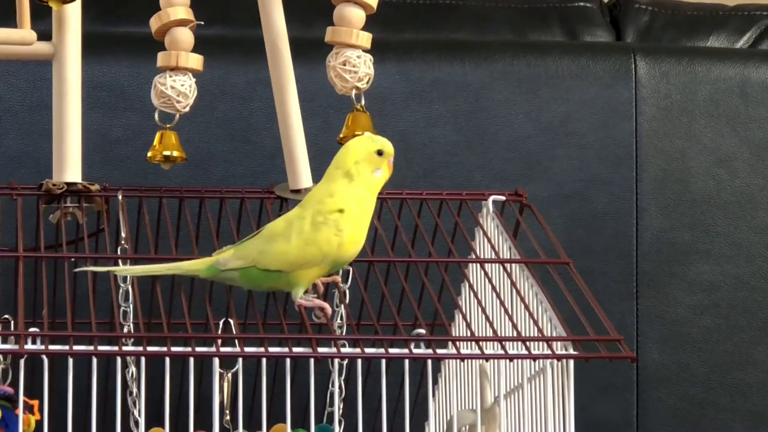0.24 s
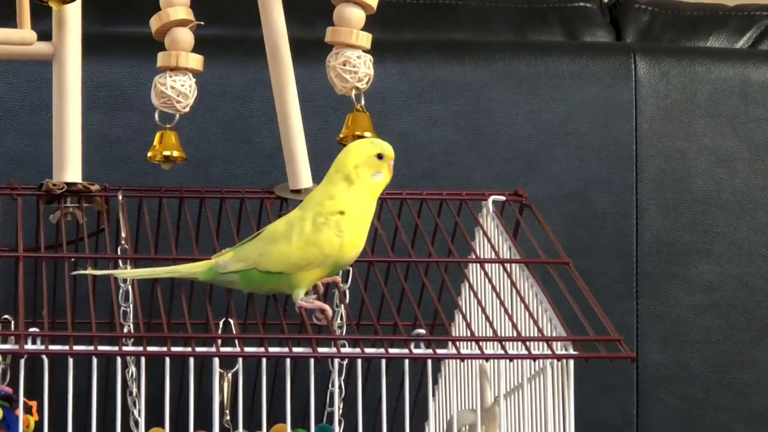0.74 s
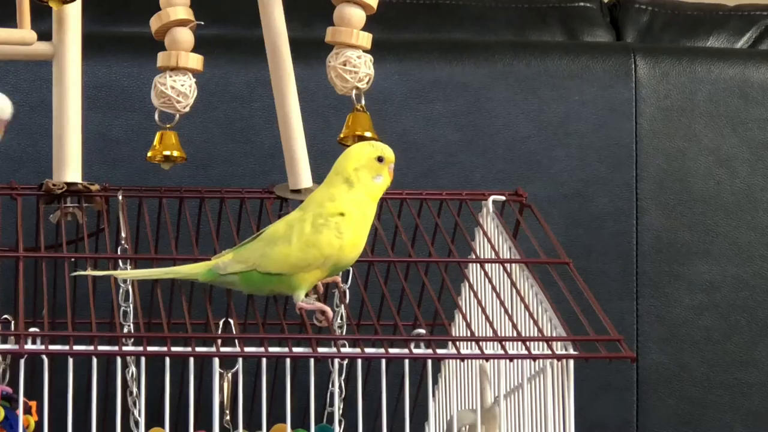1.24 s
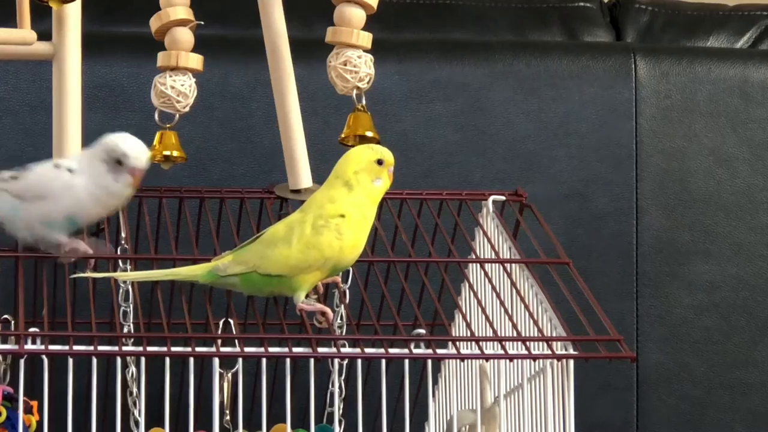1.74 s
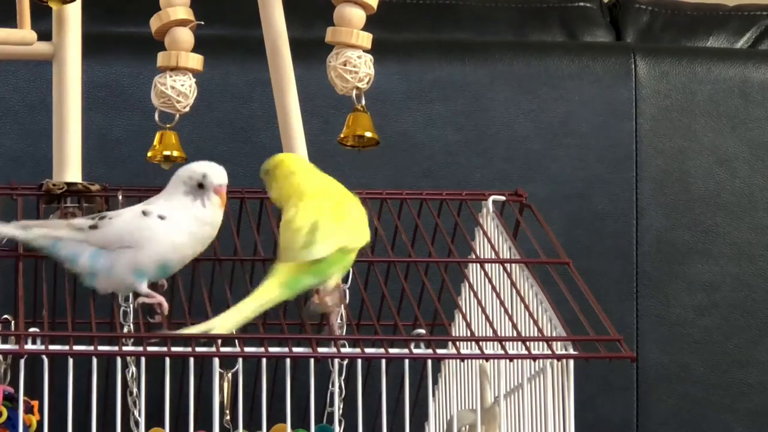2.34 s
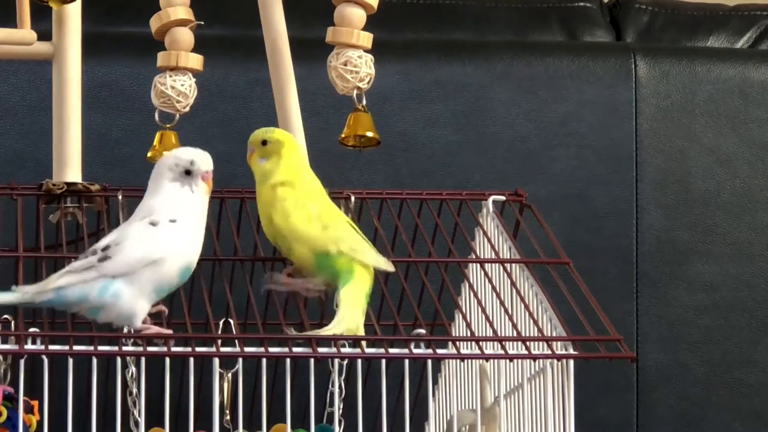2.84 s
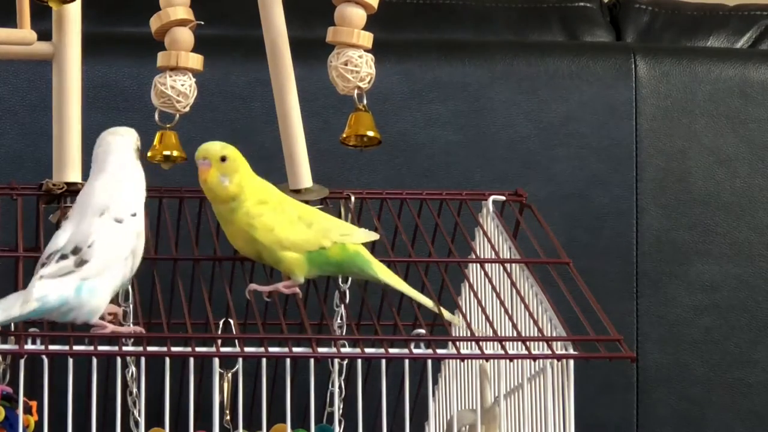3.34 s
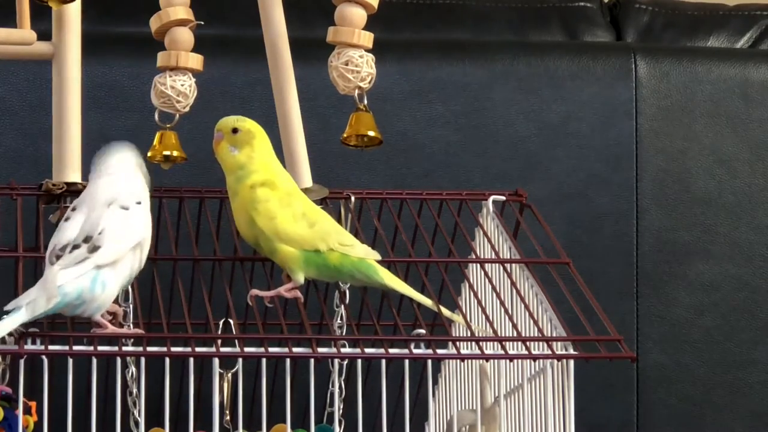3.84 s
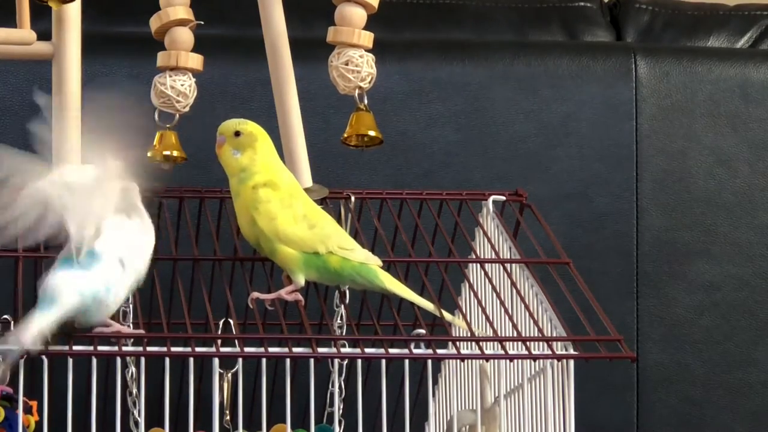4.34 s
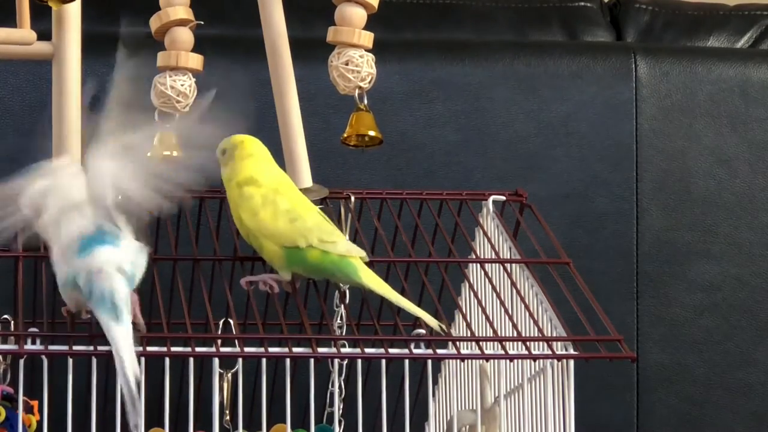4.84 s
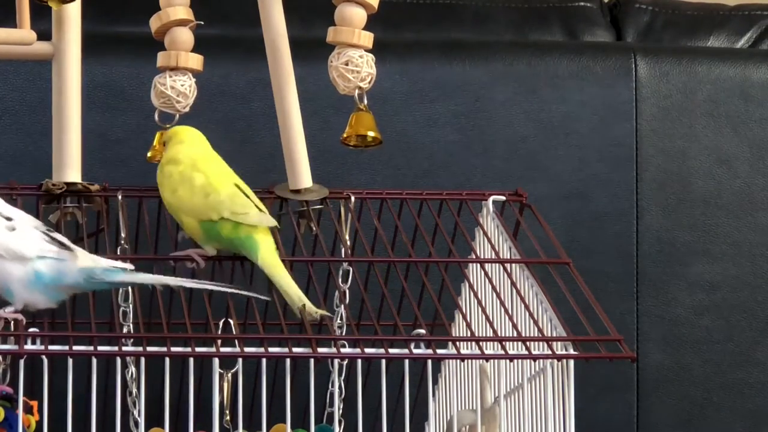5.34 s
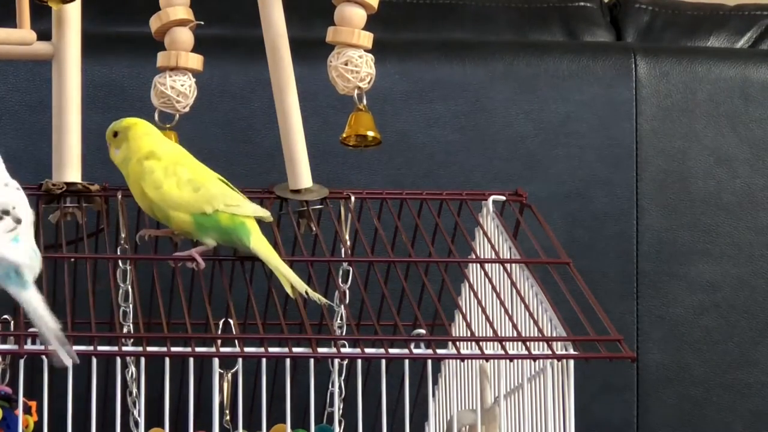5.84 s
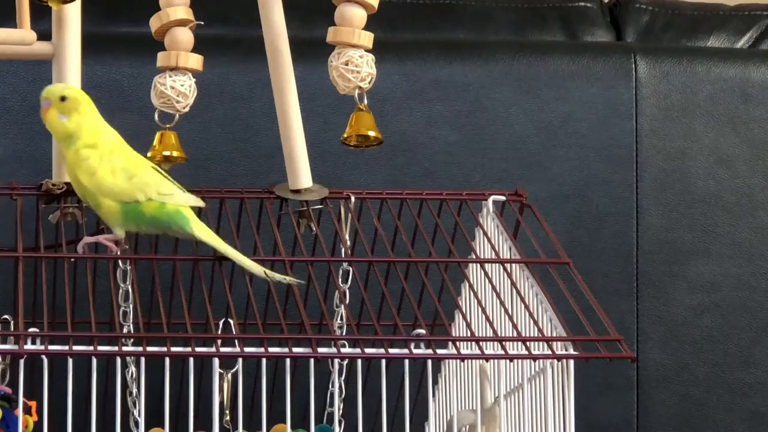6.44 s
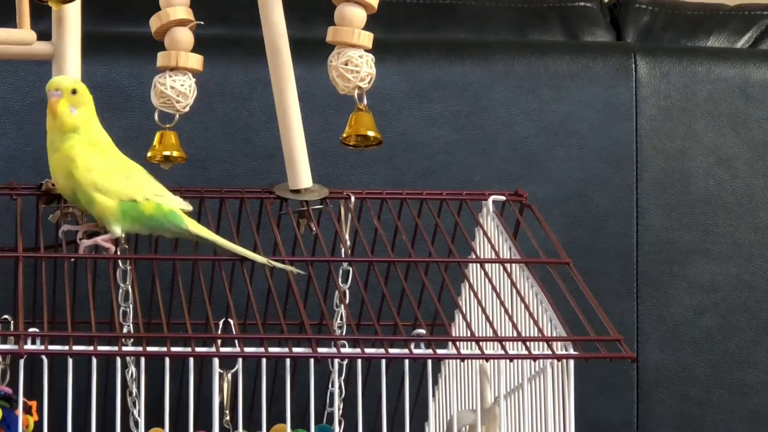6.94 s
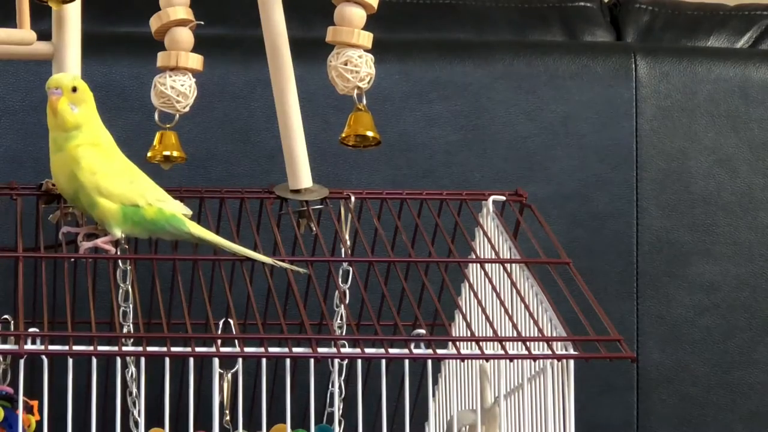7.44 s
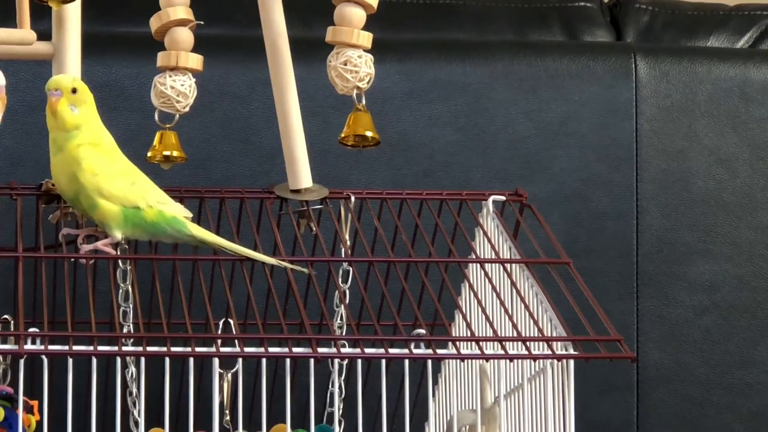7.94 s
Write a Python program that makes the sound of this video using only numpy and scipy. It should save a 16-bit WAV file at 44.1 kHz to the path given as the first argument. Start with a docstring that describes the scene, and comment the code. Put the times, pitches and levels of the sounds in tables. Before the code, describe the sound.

Two budgerigars chatter indoors with quick whistled warbles, peeps, slurs and clucks, a few harsh squawks, and faint claw scrapes on cage wires.

```python
"""Two budgerigars chatter on top of their cage in a small, fairly live room.
A quick whistled warble keeps returning among peeps, slurs and soft muttering; each note is a gliding tone.
Clucks, croaks and squawks are trains of sharp pulses that ring the throat.
Claws scrape the ringing cage wires and wings push soft gusts of air.
The walls draw out the calls and scrapes, over a quiet, steady room noise."""
import sys
import numpy as np
from scipy import signal
from scipy.fft import rfft, irfft
from scipy.io import wavfile
from scipy.ndimage import map_coordinates

SR = 44100
rng = np.random.default_rng(int(sys.argv[2]) if len(sys.argv) > 2 else 0)


def dump(signal):
    """Clip the signal to [-1, 1] and save it as 16-bit WAV at the path in sys.argv[1]."""
    limited = np.clip(np.atleast_2d(signal).T, -1, 1)
    pcm = np.round(limited * 32767).astype(np.int16)
    wavfile.write(sys.argv[1], SR, pcm)


N = 360738
LEAD_IN = SR // 5  # samples in which the room is already sounding
TOP_HZ = 15900  # the recorder keeps what lies below this

# Steady room noise. Each row: frequency in Hz, relative level in dB per Hz.
ROOM_NOISE = [(25, -26), (45, -8.5), (68, 2.5), (130, 4), (200, 1), (300, 2), (600, -3.5), (1200, -6),
              (2400, -18), (4000, -25.5), (7000, -31), (11000, -38.5), (16000, -33)]
ROOM_NOISE_DB = -55
# How long the room rings. Each row: frequency in Hz, time to fade by 60 dB in seconds.
ROOM_FADE_TIMES = [(500, 1), (2000, 0.72), (3200, 0.58), (5000, 0.52), (7000, 0.43), (10000, 0.31),
                   (15000, 0.17)]

# Wing beats. Each row: start in seconds, length in seconds, level in dB.
WING_BEATS = [(4.329, 0.12, -66), (4.807, 0.16, -65.5)]

# Claws on the cage top. Each row: start in seconds, length in seconds,
# level in dB before shorter scrapes are made softer.
CLAW_STEPS = [(0.796, 0.05, -72), (1.738, 0.027, -65.5), (1.906, 0.032, -73), (2.268, 0.22, -67.5),
              (3.192, 0.081, -69), (5.108, 0.044, -61), (5.739, 0.3, -79), (6.213, 0.054, -77.5),
              (6.399, 0.18, -66), (7.549, 0.25, -78)]
# Ringing cage wires. Each row: frequency in Hz, time to fade by 60 dB in seconds, relative level in dB.
CAGE_WIRES = [(4420, 0.37, -7.5), (5660, 0.15, -7.5), (6900, 0.21, 4.5), (8050, 0.11, -1.5),
              (9500, 0.15, -5), (10760, 0.098, -3), (12500, .15, 0), (13500, 0.13, -23), (14100, .12, -13)]

# All levels of pulsed calls and whistles below are in dB before each group is turned down as a whole.
# Upper throat resonances. Each row: multiple of the call's upper resonance, width in Hz, relative level in dB.
UPPER_RESONANCES = [(.78, 1370, -5), (1.002, 1590, 0), (1.48, 2600, -16.5)]
LOWER_WIDTH_HZ = 1500
PUFF_S = .0008  # time from a snap to the peak of its puff of air

# Long squawks that swell to a screech. Each row: start in seconds, length in seconds, first pulses per second,
# last pulses per second, level in dB, swell in dB, upper resonance in Hz, lower resonance in dB, hiss in dB.
LONG_SQUAWKS = [ (3.826, .066, 178, 217, -26, 23, 6230, -4.5, -15.5),
                (4.245, 0.082, 210, 188, -20.5, 25.5, 5770, -10.5, -23.5),
                (4.736, .077, 202, 300, -23, 11.5, 5750, -8.5, -25.5),
                (7.961, 0.074, 170, 182, -21, 12, 6400, -10.5, -22), ]
SQUAWK_LOWER_RATIO = 0.5  # lower resonance as a share of the upper

# Clucks of a few pulses. Each row: start in seconds, length in seconds, level in dB, swell in dB,
# upper resonance in Hz, lower resonance in dB, hiss in dB.
SHORT_CLUCKS = [ (0.357, .012, -36, 36, 4770, 8.5, -50), (.583, 0.0039, -47, 19, 4970, -3, -47),
                (1.154, .008, -41, 2, 4630, -3, -26), (1.187, .015, -38.5, 12, 4500, 0.5, -47),
                (1.275, 0.015, -37.5, 5, 5400, -1, -21.5), (1.991, 0.025, -35, -5, 5430, -9, -16),
                (2.749, 0.041, -38.5, 6, 5530, -4, -19.5), (6.687, 0.026, -37.5, 3.5, 5650, -2, -41),
                (6.706, .01, -28, 7, 6150, -9, -28), (6.716, 0.038, -37.5, -14, 5470, 0.5, -36),
                (6.843, 0.0058, -46, 0.5, 5650, -15, -21), ]
# First and last pulses per second of a cluck.
CLUCK_PULSE_RATES = (150, 120)
CLUCK_LOWER_RATIO = 0.54  # lower resonance as a share of the upper

# Croaks, in which the lower resonance leads. Each row: start in seconds, length in seconds, level in dB,
# lower resonance in Hz, lower resonance in dB.
LOW_CROAKS = [(1.341, 0.024, -43.5, 2020, 10), (2.795, .1, -47, 1570, 15), (5.553, .05, -48, 2330, 26)]
# First and last pulses per second of a croak.
CROAK_PULSE_RATES = (230, 160)
CROAK_SWELL_DB, CROAK_UPPER_HZ, CROAK_HISS_DB = -5, 5470, -20.5

NOTE_RISE_S, NOTE_FALL_S = .0045, .006  # how fast every whistled note starts and stops

# Soft muttering. Each row: start in seconds, length in seconds, level in dB.
MUTTER_STRETCHES = [(0.468, .05, -57), (1.775, .10, -56.5), (2.383, .13, -51.5), (2.912, .15, -55),
                    (5.615, .09, -58), (5.719, .80, -60)]
MUTTER_STEP_S, MUTTER_NOTE_S = .055, 0.029  # spacing and length of its notes
MUTTER_HZ, MUTTER_OCTAVES = 2248, .35  # centre of their pitch, and reach either way

# Parts of one swoop: a steep drop, a shallow slide and a soft after-note. Each row: delay in seconds,
# length in seconds, start, middle and end pitch in Hz, level in dB within the swoop, second harmonic in dB.
SWOOP_PARTS = [(0, 0.016, 3570, 2865, 2160, 0.5, -23), (0.016, .026, 2160, 1865, 1540, -0.5, -36),
               (0.07, .022, 3000, 2000, 1550, -3.5, -33)]
RUN_S, RUN_STEP_S, RUN_COUNT = 7.542, .1035, 4  # start, spacing and number of swoops
RUN_DB, RUN_FADE_DB = -46.5, 0.9  # first level, loss per swoop

# Slurs slide down through a pitch. Each row: start in seconds, length in seconds, pitch in Hz,
# level in dB, second harmonic in dB.
SLUR_NOTES = [ (.40, 0.052, 2520, -50.5, -27), (.738, .022, 2920, -47.5, -36), (1.348, 0.023, 1893, -48, 6),
              (1.372, 0.02, 3550, -33.5, -10), (1.412, .024, 2170, -46, -25),
              (1.49, 0.036, 2733, -30.5, -17), (1.56, 0.024, 2574, -41, -33),
              (1.596, 0.047, 2010, -47.5, -20), (1.643, 0.024, 2520, -42, -33),
              (1.718, 0.039, 1800, -47.5, -7), (2.055, 0.018, 2780, -37, 5.5),
              (2.16, .054, 2267, -42, -6.5), (2.98, 0.035, 3500, -51, -28), (4.05, .048, 2345, -48, -18),
              (5.657, 0.017, 1720, -49.5, -25), (5.808, .045, 1807, -48, -23),
              (6.056, 0.024, 2500, -50.5, -24), (6.221, 0.023, 2210, -51, -29),
              (6.008, 0.034, 1895, -51, -39), (6.387, 0.029, 1898, -51.5, -32),
              (6.959, 0.035, 2132, -45, -11), (7.137, 0.022, 1820, -47.5, -21),
              (7.424, 0.042, 1924, -47, -29), ]
# Start, middle and end of a slur, as multiples of its pitch.
SLUR_CONTOUR = (1.15, 0.99, .81)
# Peeps scoop up to a pitch and hold it. Each row: start in seconds, length in seconds, pitch in Hz,
# level in dB, second harmonic in dB.
PEEP_NOTES = [ (-.05, 0.11, 3280, -47, -30), (.361, 0.035, 3360, -38.5, -38), (.449, .016, 2300, -55, -24),
              (.779, 0.013, 3234, -42, -18), (1.29, 0.029, 4660, -39.5, -11.5),
              (1.433, 0.057, 3617, -32.5, -18), (1.461, .028, 4170, -30, -20),
              (1.541, 0.038, 3020, -32, -24.5), (1.60, 0.014, 3080, -41.5, -25),
              (1.681, .029, 3050, -43, -24.5), (1.80, 0.014, 2960, -45, -29.5),
              (2.012, .036, 4780, -35.5, -3), (2.33, 0.038, 2524, -47.5, -30), (2.54, 0.05, 2623, -51, -23),
              (2.783, 0.023, 2018, -42, -4.5), (2.872, 0.015, 1820, -42, -25),
              (2.954, 0.019, 2058, -44.5, -14), (3.57, 0.007, 1920, -41, -7.5),
              (3.668, 0.02, 2990, -37.5, -24.5), (3.694, 0.025, 3310, -35, -22.5),
              (5.152, 0.071, 3328, -37.5, -18), (5.12, 0.032, 2370, -36, -33),
              (5.56, .03, 1062, -52.5, 5.5), (5.592, 0.02, 1250, -46, 1.5),
              (5.911, .045, 2050, -51.5, -26.5), (6.259, 0.027, 1964, -46.5, -27.5),
              (6.312, .02, 2814, -49.5, -25), (6.431, 0.03, 3030, -52, -31),
              (6.843, 0.0089, 4750, -31.5, -22), (6.883, .016, 2140, -37.5, -5),
              (6.979, 0.0094, 2900, -35, -28), (6.997, .045, 3384, -39, -16.5),
              (7.499, 0.018, 3140, -53, -11), ]
# Start, middle and end of a peep, as multiples of its pitch.
PEEP_CONTOUR = (0.93, 0.98, 1.005)

# The warble's four syllables: a dive, a dip, an arch and a fall. Each row: start as a share of the warble,
# length as a share, start, middle and end pitch in Hz before the warble's pitch ratio,
# level in dB within the warble, second harmonic in dB.
WARBLE_SYLLABLES = [(0, .26, 4924, 4217, 3177, -2, -21.5), (.25, 0.14, 3170, 2530, 2100, -2, -30),
                    (.46, .24, 2355, 2956, 3023, -2.5, -24), (.70, .30, 2664, 2330, 1942, -1.5, -30.5)]
# Warbles. Each row: start in seconds, length in seconds, pitch ratio, level in dB,
# swell from the dive to the fall in dB (negative: the dive is the louder).
WARBLE_TIMES = [ (-.165, 0.11, 1, -37.5, 25), (.709, .112, 1.05, -42, 17), (1.313, 0.11, 1.064, -37, -7.5),
                (2.023, 0.12, 1.17, -33.5, 7), (3.183, .118, 1.045, -44.5, 16.5),
                (3.543, 0.13, 0.9, -43.5, 14), (5.024, .12, 1.04, -39.5, 7), (6.857, .108, 1.02, -40, -5),
                (7.297, .12, .93, -40, 19), ]


def undb(db):
    """Turn decibels into a gain."""
    return 10 ** (np.asarray(db) / 20)


def unit(x):
    """Scale to an average strength (rms) of 1."""
    return x / np.sqrt(np.mean(x ** 2) + 1e-18)


def add(track, start, sound):
    """Mix a sound into the track at its time in seconds."""
    first = max(0, LEAD_IN + int(start * SR))
    part = sound[:len(track) - first]
    track[first:first + len(part)] += part


def at_hz(points, hz):
    """Read between (Hz, value) points, with frequency on a log scale."""
    point_hz, value = np.transpose(points)
    return np.interp(np.log(np.maximum(hz, 1)), np.log(point_hz), value)


def wobble(t, rate):
    """Smooth random motion through `rate` random points per second."""
    knots = rng.standard_normal(256)
    return map_coordinates(knots, [t * rate], order=3, mode="wrap")


def gate(t, length, rise, fall):
    """Open over `rise` seconds and close over `fall` seconds, with the closing centred on the end."""
    opening = np.sin(np.pi / 2 * np.clip(t / rise, 0, 1))
    closing = np.sin(np.pi / 2 * np.clip((length - t) / fall + .5, 0, 1)) ** 2
    return opening * closing


def ring_down(t, fade_s):
    """Fade away steadily, by 60 dB in `fade_s` seconds."""
    return np.exp(-np.log(1000) * t / fade_s)


def resonance(hz, centre_hz, width_hz):
    """Power response of a steep-sided resonance."""
    return (1 + ((hz ** 2 - centre_hz ** 2) / (hz * width_hz)) ** 2) ** -2.


def hush():
    """Steady, dull room noise: random noise shaped by frequency."""
    hz = np.arange(N // 2 + 1) * SR / N
    spectrum = rfft(rng.standard_normal(N)) * undb(at_hz(ROOM_NOISE, hz))
    return unit(irfft(spectrum, N)) * undb(ROOM_NOISE_DB)


def room(x, wet_db, early_db, early_s=0.012, gap_s=0.0021):
    """Direct sound, quick reflections from near furniture, then a diffuse tail that loses its treble first."""
    t = np.arange(SR) / SR
    noise = rfft(rng.standard_normal(SR))
    hz = np.arange(SR // 2 + 1)
    centres = np.geomspace(500, 16000, 11)
    tail = 0
    # split the noise into overlapping bands and let each fade at its own pace
    for centre, weights in zip(centres, np.eye(len(centres))):
        band = irfft(noise * at_hz(np.c_[centres, weights], hz), SR)
        tail = tail + band * ring_down(t, at_hz(ROOM_FADE_TIMES, centre))
    sparse = rng.random(SR) < .02
    early = rng.standard_normal(SR) * sparse * np.exp(-t / early_s)
    reflections = undb(wet_db) * unit(tail) + undb(early_db) * unit(early)
    response = reflections * (t > gap_s) / np.sqrt(SR)
    return x + signal.fftconvolve(x, response)[:len(x)]


def wings(beats_per_s=17, gust_hz=75):
    """Beating wings push soft gusts of air, made of low rumbling noise, at the microphone."""
    track = np.zeros(LEAD_IN + N)
    lowpass = signal.butter(2, gust_hz, fs=SR, output="sos")
    for start, length, db in WING_BEATS:
        t = np.arange(int(length * SR)) / SR
        air = signal.sosfilt(lowpass, rng.standard_normal(len(t)))
        beats = np.sin(np.pi * beats_per_s * t) ** 2
        swell = np.sin(np.pi * t / length)
        add(track, start, undb(db) * unit(air * beats * swell))
    return track


def claws(scratch_db=17, scratch_s=0.0048):
    """Shuffling feet scrape over the cage wires, which ring faintly."""
    t = np.arange(SR // 2) / SR
    ring = sum(undb(db) * np.sin(2 * np.pi * hz * t) * ring_down(t, fade_s)
               for hz, fade_s, db in CAGE_WIRES)
    ring = ring + undb(scratch_db) * rng.standard_normal(len(t)) * np.exp(-t / scratch_s)
    track = np.zeros(LEAD_IN + N)
    for start, length, db in CLAW_STEPS:
        slips = rng.standard_normal(len(t)) * undb(9.0 * wobble(t, 60))
        slips = slips * gate(t, length, length / 2, length / 2)
        scrape = unit(signal.fftconvolve(slips, ring))
        add(track, start, undb(db) * np.sqrt(length) * scrape)
    return room(track, wet_db=1.5, early_db=-20)


def throat(upper_hz, lower_hz, lower_db, hiss_db, hiss_from_hz=1700, size=512):
    """How throat and beak ring after a click: a few resonances over a broad hiss."""
    hz = np.maximum(np.arange(size // 2 + 1) * SR / size, 1)
    power = sum(undb(2 * db) * resonance(hz, multiple * upper_hz, width)
                for multiple, width, db in UPPER_RESONANCES)
    power = power + undb(2 * lower_db) * resonance(hz, lower_hz, LOWER_WIDTH_HZ)
    power = power + undb(2 * hiss_db) / (1 + (hiss_from_hz / hz) ** 4)
    # keeping half of the cepstrum makes the ringing start at the click, not before it
    cepstrum = irfft(np.log(power + 1e-7))[:size // 2]
    return irfft(np.exp(rfft(cepstrum, size)))


def squawk(length, first_rate, last_rate, swell_db, ring, jitter=.05, snap=2, crest=0.72,
           uneven_db=1.5, split_hz=3800, low_swell=0.24, onset=0.12):
    """The syrinx (voice organ) snaps open in pulses; each snap and its puff of air ring the throat."""
    t = np.arange(int((length + .01) * SR)) / SR
    rate = np.interp(t, [0, length], [first_rate, last_rate]) * (1 + jitter * wobble(t, 150))
    cycles = np.cumsum(rate) / SR
    age = cycles % 1 / rate  # seconds since the latest snap
    snaps = np.diff(np.floor(cycles), prepend=-1)
    air = rng.standard_normal(SR // 4)[:len(t)]
    puff = age / PUFF_S * np.exp(1 - age / PUFF_S)
    source = (snap * snaps + air * puff) * (t - age < length)
    voice = unit(signal.fftconvolve(source, ring)[:len(t)]) * np.sqrt(t[-1] / length)
    effort_db = swell_db * (np.minimum(t / (crest * length), 1) - 1)
    # the treble follows effort more than the low part, so a swelling call opens from dull to harsh
    low = signal.sosfiltfilt(signal.butter(4, split_hz, fs=SR, output="sos"), voice)
    treble = voice - low
    voice = low * undb(low_swell * effort_db) + treble * undb(effort_db)
    return voice * undb(uneven_db * wobble(t, 154)) * np.minimum(t / (onset * length), 1)


def scolding():
    """All the squawks, clucks and croaks, heard through the room."""
    track = np.zeros(LEAD_IN + N)
    for start, length, first_rate, last_rate, db, swell_db, upper_hz, lower_db, hiss_db in LONG_SQUAWKS:
        ring = throat(upper_hz, SQUAWK_LOWER_RATIO * upper_hz, lower_db, hiss_db)
        add(track, start, undb(db) * squawk(length, first_rate, last_rate, swell_db, ring))
    for start, length, db, swell_db, upper_hz, lower_db, hiss_db in SHORT_CLUCKS:
        ring = throat(upper_hz, CLUCK_LOWER_RATIO * upper_hz, lower_db, hiss_db)
        add(track, start, undb(db) * squawk(length, *CLUCK_PULSE_RATES, swell_db, ring))
    for start, length, db, lower_hz, lower_db in LOW_CROAKS:
        ring = throat(CROAK_UPPER_HZ, lower_hz, lower_db, CROAK_HISS_DB)
        add(track, start, undb(db) * squawk(length, *CROAK_PULSE_RATES, CROAK_SWELL_DB, ring))
    return undb(-4.5) * room(track, wet_db=-1.5, early_db=-2.5)


def whistle(length, start_hz, middle_hz, end_hz, second_db, quiver=0.019, rasp=0.036, steady=0.4,
            flutter_db=4.5, third_db=-20, brightness=0.8, top_db=-34, top_hz=13800, top_width_hz=3000):
    """The syrinx glides through three pitches; its membranes quiver and add overtones."""
    t = np.arange(int((length + .01) * SR)) / SR
    bend = np.polyfit([0, .5, 1], np.log([start_hz, middle_hz, end_hz]), 2)
    glide = np.polyval(bend, np.minimum(t / length, 1))
    strain = min(steady + 2 * np.ptp(glide), 1)  # held notes stay purer, wide sweeps turn rough
    shake = quiver * wobble(t, 461) + rasp * wobble(t, 1600)
    hz = np.exp(glide) * (1 + strain * shake)
    phase = 2 * np.pi * np.cumsum(hz) / SR
    tone = np.sin(phase) + undb(second_db) * np.sin(2 * phase)
    tone = tone + undb(third_db + brightness * second_db) * np.sin(3 * phase)
    # extra overtones show where they cross a resonance of the beak
    for k in range(3, 6):
        beak = np.sqrt(resonance(k * hz, top_hz, top_width_hz))
        tone = tone + undb(top_db) * beak * np.sin(k * phase) * (k * hz < SR / 2)
    flutter = undb(flutter_db * wobble(t, 215.7))
    return np.sqrt(2) * tone * flutter * gate(t, length, NOTE_RISE_S, NOTE_FALL_S)


def mutter(slur_share=.65, scatter_db=3, stray_s=0.0097, second_db=-25):
    """Soft slurs and peeps at chance pitches, loosely spaced."""
    for start, length, db in MUTTER_STRETCHES:
        chance = rng.uniform(-1, 1, (64, 4))
        beats = np.arange(start, start + length, MUTTER_STEP_S)
        for beat, (late, high, loud, kind) in zip(beats, chance):
            shape = SLUR_CONTOUR if abs(kind) < slur_share else PEEP_CONTOUR
            contour = MUTTER_HZ * 2 ** (MUTTER_OCTAVES * high) * np.array(shape)
            yield beat + stray_s * late, MUTTER_NOTE_S, contour, db + scatter_db * loud, second_db


def swoops():
    """The same swoop repeats evenly and fades; the last one has no after-note."""
    for k in range(RUN_COUNT):
        parts = SWOOP_PARTS if k < RUN_COUNT - 1 else SWOOP_PARTS[:-1]
        for delay, length, *contour, db, second_db in parts:
            start = RUN_S + k * RUN_STEP_S + delay
            yield start, length, contour, RUN_DB - k * RUN_FADE_DB + db, second_db


def calls(table, shape):
    """Single notes that share one pitch shape."""
    for start, length, hz, db, second_db in table:
        yield start, length, hz * np.array(shape), db, second_db


def phrases(swell_curve=3):
    """Every warble sings the same syllables at its own tempo, pitch and swell."""
    for begin, length, pitch, db, swell_db in WARBLE_TIMES:
        for start, share, *contour, accent_db, second_db in WARBLE_SYLLABLES:
            effort_db = accent_db - swell_db * (1 - start) ** swell_curve
            hz = pitch * np.array(contour)
            yield begin + start * length, share * length, hz, db + effort_db, second_db


def warble():
    """All the whistled notes, heard through the room."""
    track = np.zeros(LEAD_IN + N)
    peeps = calls(PEEP_NOTES, PEEP_CONTOUR)
    slurs = calls(SLUR_NOTES, SLUR_CONTOUR)
    notes = [*phrases(), *peeps, *slurs, *swoops(), *mutter()]
    for start, length, contour, db, second_db in notes:
        add(track, start, undb(db) * whistle(length, *contour, second_db))
    return undb(-3.0) * room(track, wet_db=-2.5, early_db=-5.5)


def scene():
    """The birds over the room noise."""
    birds = warble() + scolding() + claws() + wings()
    return (birds[LEAD_IN:] + hush())[None]


def record(dry):
    """The recorder cuts the very top of the treble."""
    return signal.sosfilt(signal.ellip(10, .2, 70, TOP_HZ, fs=SR, output="sos"), dry)


dry = scene()
out = record(dry)
dump(out)
```